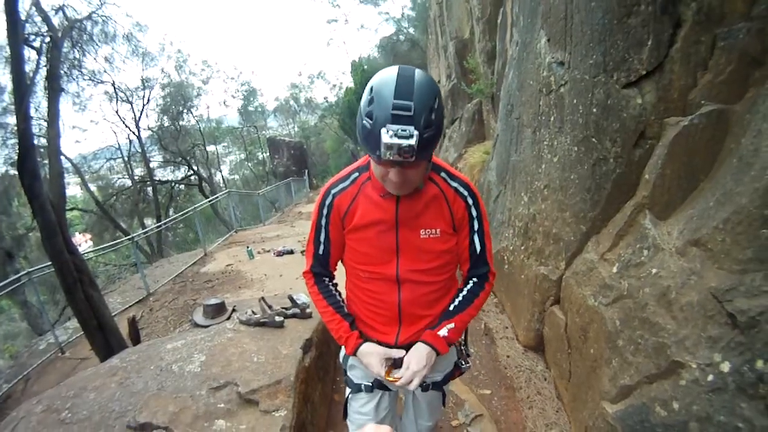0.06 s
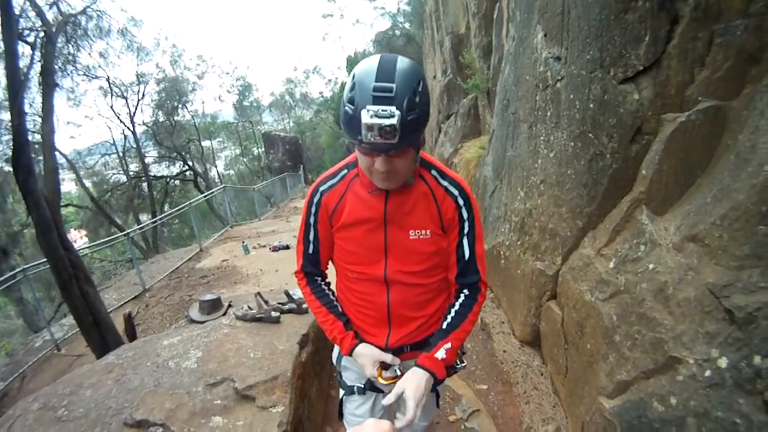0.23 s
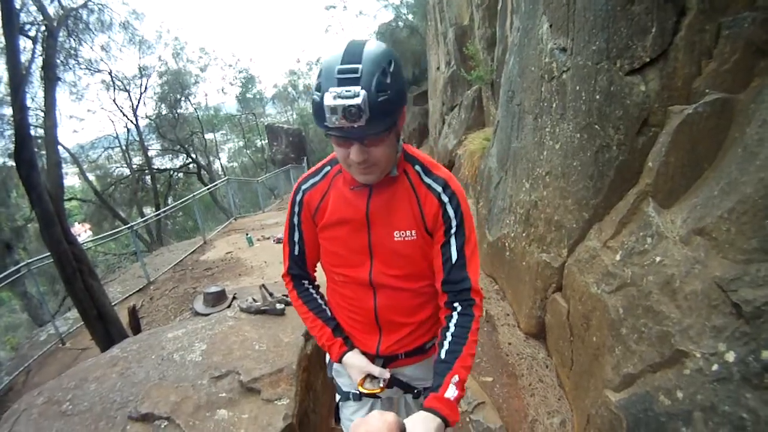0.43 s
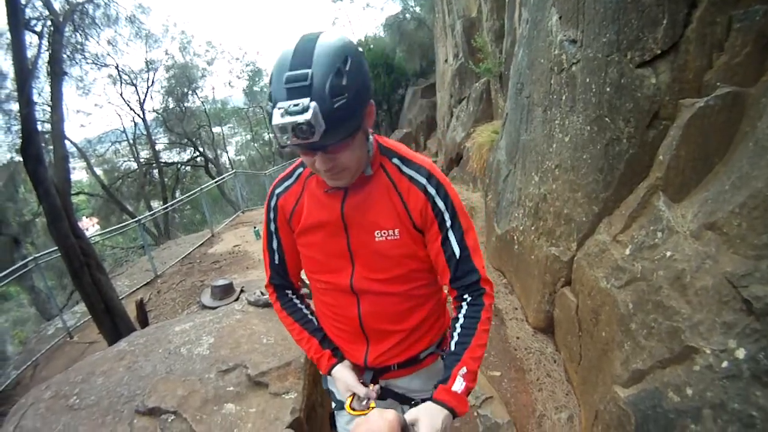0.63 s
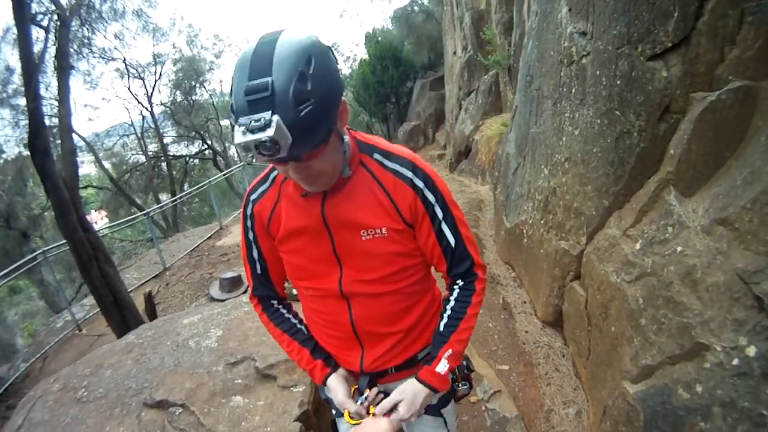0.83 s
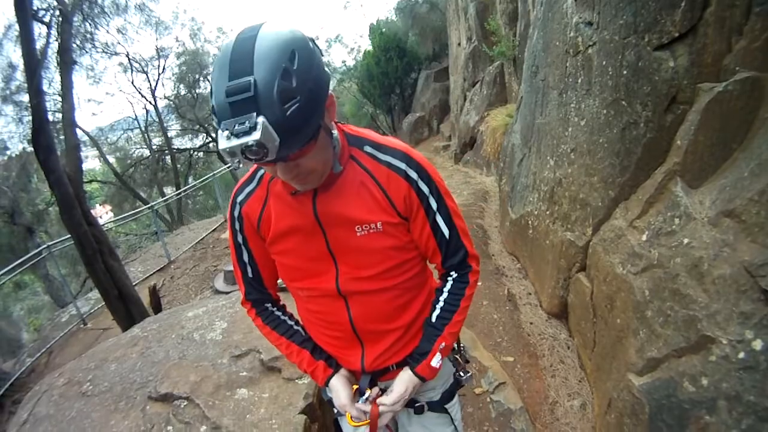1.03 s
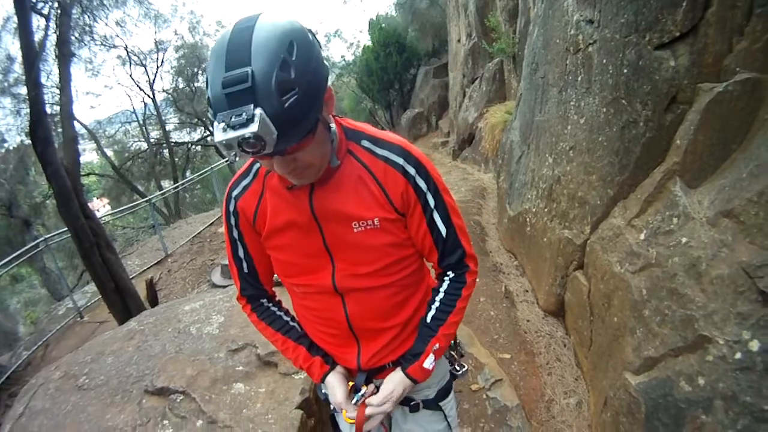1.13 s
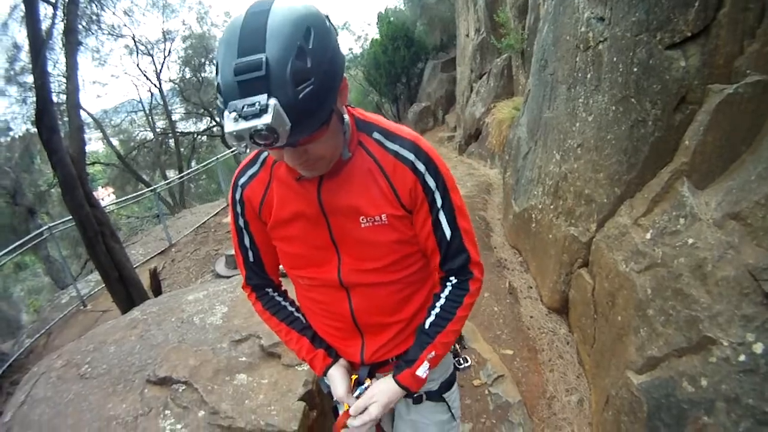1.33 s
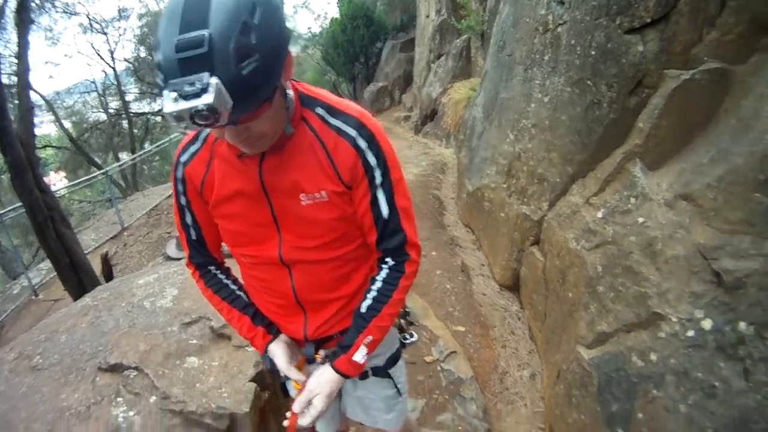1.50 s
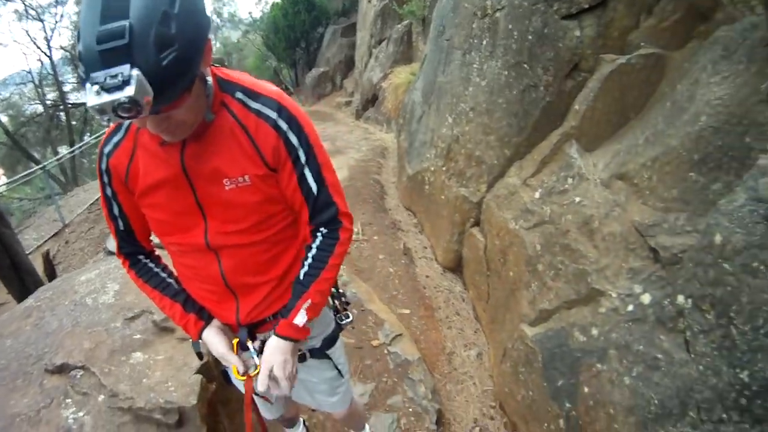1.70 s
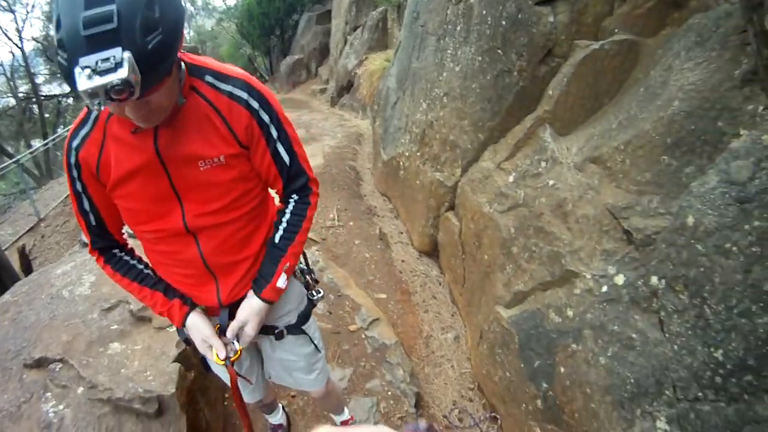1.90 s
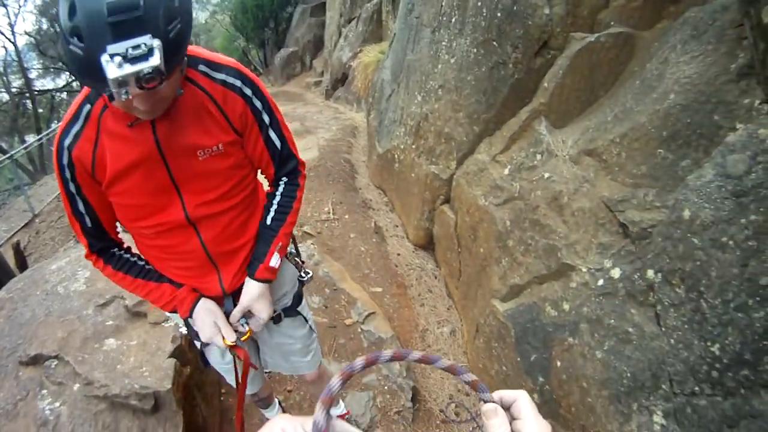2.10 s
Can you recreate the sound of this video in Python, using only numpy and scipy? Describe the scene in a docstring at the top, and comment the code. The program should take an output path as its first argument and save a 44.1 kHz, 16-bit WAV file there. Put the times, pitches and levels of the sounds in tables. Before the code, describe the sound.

A carabiner gate snaps shut at about 1.5 seconds with one sharp, briefly ringing metallic click. Before that, handled climbing gear clinks and ticks faintly, with a tiny scrape near 1.1 seconds. Dull knocks and low thumps on the body-worn microphone come between 0.2 and 0.8 seconds, with another low thump around 1.2. Steady outdoor hiss and rumble continue throughout, dipping briefly after the click.

```python
"""Climbing gear at the foot of a rock face, over steady outdoor hiss and low rumble.
Handled hardware clinks once, then ticks faintly; from 0.2 s a body-worn camera is knocked and sways.
At 1.14 s metal scrapes briefly on metal. At 1.48 s a carabiner gate snaps shut: it cracks, rattles
and rings the frame, with faint echoes from ground and rock.
Gain control ducks the hiss after each loud moment."""
import sys
import numpy as np
from scipy import signal
from scipy.fft import rfft, irfft
from scipy.io import wavfile
from scipy.ndimage import uniform_filter1d

SR = 44100
rng = np.random.default_rng(int(sys.argv[2]) if len(sys.argv) > 2 else 0)


def bounce(signal):
    """Save signal as a 16-bit WAV file at the path given by the first command-line argument."""
    frames = np.transpose(np.atleast_2d(signal))
    limited = np.clip(frames, -1, 1)
    pcm = np.round(limited * 32767).astype(np.int16)
    wavfile.write(sys.argv[1], SR, pcm)


N = 94815
BINS_HZ = np.fft.rfftfreq(N, 1 / SR)


def amp(db):
    """Decibels to gain."""
    return 10 ** (np.asarray(db) / 20)


def unit_rms(x):
    """Scales to rms 1."""
    return x / np.sqrt(np.mean(x ** 2) + 1e-20)


def at_hz(table, hz):
    """Interpolates a table over log frequency."""
    table_hz, value = np.transpose(table)
    return np.interp(np.log(hz + 1), np.log(table_hz + 1), value)


def since(start_s):
    """Seconds since the start, zero before."""
    return np.maximum(np.arange(N) / SR - start_s, 0)


def noise(spectrum):
    """Shaped noise, rms 1."""
    return unit_rms(irfft(rfft(rng.standard_normal(N)) * amp(at_hz(spectrum, BINS_HZ)), N))


def decay(t, t60_s):
    """Exponential decay."""
    return np.exp(-np.log(1000) * t / t60_s)


def strike(t, rise_s, t60_s):
    """Quick rise, exponential decay."""
    return (1 - np.exp(-t / rise_s)) * decay(t, t60_s)


def ring(start_s, modes, pitch_ratio=1):
    """Struck modes as damped sines."""
    t = since(start_s)
    return sum(amp(db) * strike(t, rise_s, t60_s) * np.sin(2 * np.pi * hz * pitch_ratio * t)
               for hz, db, t60_s, rise_s in modes)


def delayed(x, delay_s):
    """Delay, cut to N samples."""
    return np.concatenate([np.zeros(round(delay_s * SR)), x, np.zeros(N)])[:N]


def click(spectrum, size=2048):
    """Minimum-phase click, peak 1."""
    log_gain = np.log(amp(at_hz(spectrum, abs(np.fft.fftfreq(size, 1 / SR)))))
    pulse = np.fft.ifft(np.exp(np.conj(signal.hilbert(log_gain)))).real
    return pulse / abs(pulse).max()


def lowpass(x, hz, order):
    """Causal low-pass."""
    return signal.sosfilt(signal.butter(order, hz, fs=SR, output="sos"), x)


# gate contacts (time [s], level [dB])
GATE_CONTACTS = [(1.4808, -28), (1.4826, 0), (1.4902, -17), (1.4925, -12)]
# contact crack (frequency [Hz], level [dB])
CRACK_SPECTRUM = [(300, -42), (1100, -10), (1700, -13), (2400, 1), (3200, -2), (4300, -19), (6000, -34),
                  (9300, -10.5), (11500, -39), (13000, -30), (14700, -9), (16500, -33)]
# gate rattle (frequency [Hz], relative density [dB])
RATTLE_SPECTRUM = [(400, -19), (1100, -5), (1650, -6), (2400, 0), (3100, -1), (4100, -2), (5400, 2),
                   (6050, -17), (6700, 1.5), (9700, -5), (11000, -28), (13000, -32), (14300, -5),
                   (15000, -10), (15600, -23)]
# carabiner frame (frequency [Hz], level [dB], t60 [s], rise [s])
FRAME_MODES = [(1210, -21.5, 0.059, 0.00033), (1964, -24.5, .08, 0.00025), (2033, -14.5, 0.085, 0.00024),
               (2440, -22, 0.096, .0003), (2873, -17, 0.059, .0003), (3230, -26, .08, .0003),
               (4860, -20, .07, 0.00087), (4997, -1, 0.05, 0.0015), (5130, -17.5, .14, .002),
               (5640, -19, .05, .001), (6560, -19, 0.081, .001), (6849, -18, 0.1, .002),
               (7030, 0.5, 0.043, 0.0039), (9440, -26, .05, .0003)]


def gate_snap(snap_s=1.4829, seated_s=1.4925):
    """Each contact cracks; the main one rings the frame and rattles the gate. Seating damps the ring."""
    crack = amp(-0.5) * click(CRACK_SPECTRUM)
    cracks = sum(amp(db) * delayed(crack, time_s) for time_s, db in GATE_CONTACTS)
    rattle_db, side_db, hold_s = -16.5, -19, 0.0094
    grit = noise(RATTLE_SPECTRUM) + amp(side_db) * np.outer([1, -1], noise(RATTLE_SPECTRUM))
    rattle = (since(snap_s) > 0) * decay(since(snap_s + hold_s), t60_s=0.042) * grit
    damping_db, seating_s = -8.5, 0.0018
    damping = amp(damping_db * np.minimum(since(seated_s) / seating_s, 1))
    return cracks + damping * ring(snap_s, FRAME_MODES) + amp(rattle_db) * rattle


# gear touches (time [s], noise level [dB], rise [s], t60 [s], ping frequency [Hz], ping level [dB])
GEAR_TOUCHES = [(0.039, -32.5, .001, 0.065, 2610, -33), (.073, -28, 0.0035, .06, 2220, -35),
                (0.1416, -35, 0.0018, 0.037, 3900, -32.5), (.341, -29, 0.0033, 0.08, 2660, -34),
                (0.4402, -29, 0.00078, 0.038, 1180, -23), (0.5366, -27.5, 0.00055, .032, 2006, -33),
                (0.9455, -31, .0005, 0.019, 2030, -24), (1.1327, -27.5, .0004, .1, 3920, -33),
                (1.441, -30, 0.0038, 0.074, 3980, -34)]
# touch noise (frequency [Hz], relative density [dB])
TOUCH_SPECTRUM = [(600, -9), (1400, -13.5), (2150, 3.5), (2900, -8.5), (3700, -1), (5000, -12), (6000, -18),
                  (7000, -13), (8300, -9.5), (9700, -10), (11500, -28), (13000, -25), (14500, -10),
                  (16000, -30)]


def gear_ticks():
    """Each light touch of hardware gives a noise burst and rings one note."""
    grit = noise(TOUCH_SPECTRUM)
    ticks = np.zeros(N)
    for time_s, grit_db, rise_s, t60_s, ping_hz, ping_db in GEAR_TOUCHES:
        t = since(time_s)
        ping = amp(ping_db) * np.sin(2 * np.pi * ping_hz * t)
        ticks += strike(t, rise_s, t60_s) * (amp(grit_db) * grit + ping)
    return ticks


# one slide (time [s], length [s], level [dB])
SCRAPE_STROKE = (1.136, 0.017, -33.5)
# sliding metal (frequency [Hz], width [Hz], relative level [dB])
SCRAPE_RESONANCES = [(3880, 700, -1), (5650, 270, 2), (6390, 300, 0), (8050, 600, -5)]


def gear_scrape():
    """Metal slides on metal: friction noise through its resonances."""
    start_s, length_s, level_db = SCRAPE_STROKE
    response = sum(amp(db) / (1 + 2j * (BINS_HZ - hz) / width_hz) ** 2
                   for hz, width_hz, db in SCRAPE_RESONANCES)
    friction = unit_rms(irfft(rfft(rng.standard_normal(N)) * response, N))
    stroke = np.sin(np.pi * np.minimum(since(start_s) / length_s, 1))
    return amp(level_db) * stroke * friction


# clinking hardware (frequency [Hz], level [dB], t60 [s], rise [s])
CLINK_MODES = [(3590, -34, 0.086, .0005), (5030, -38, 0.049, .0005), (8414, -41, 0.15, .0005)]


def gear_clink():
    """Hardware rings faintly at the start."""
    return ring(0, CLINK_MODES)


# reflections (delay [s], level [dB])
ROCK_REFLECTIONS = [(.0135, -26), (.0275, -24)]


def rock_echoes(stereo):
    """Ground and rock face each return a faint near echo."""
    return np.array([sum(amp(db) * delayed(channel, delay_s) for delay_s, db in ROCK_REFLECTIONS)
                     for channel in stereo])


# knocks on the camera (time [s], level [dB], pitch [ratio])
HOUSING_KNOCKS = [(0.2096, -10.5, 0.89), (0.2212, -23, 0.79), (0.4379, -5, 0.99), (0.4561, -15.5, 1.01),
                  (.641, -19.5, 0.79), (.662, -26, .8), (0.765, -7, 0.96)]
# camera housing (base frequency [Hz], relative level [dB], t60 [s], rise [s])
HOUSING_MODES = [(107.2, -0.5, 0.061, 0.0013), (202.4, 3, .028, 0.0012), (285, -4, 0.051, 0.0025)]
KNOCK_CUTOFF_HZ = 384


def camera_knocks():
    """Each knock rings the housing with a dull puff of noise."""
    dull_noise = amp(-14.5) * unit_rms(lowpass(rng.standard_normal(N), KNOCK_CUTOFF_HZ, order=4))
    knocks = np.zeros(N)
    for time_s, db, pitch_ratio in HOUSING_KNOCKS:
        puff = dull_noise * strike(since(time_s), rise_s=0.0015, t60_s=0.089)
        knocks += amp(db) * (puff - ring(time_s, HOUSING_MODES, pitch_ratio))
    return lowpass(knocks, KNOCK_CUTOFF_HZ, order=6)


# mount motion (peak time [s], level [dB], frequency [Hz], rise [s], fall [s])
MOUNT_SWAYS = [(.364, -2, 41.4, 0.016, 0.029), (.549, -20.5, 25.6, .01, .05), (.685, -19, 27.6, .03, .03),
               (0.808, -16, 39.8, 0.027, 0.013), (1.205, -2, 38, 0.023, 0.028),
               (1.294, -9, 40.8, 0.022, .012)]


def mount_sway():
    """The camera mount swings for a cycle or two at a time."""
    sways = np.zeros(N)
    for peak_s, db, hz, rise_s, fall_s in MOUNT_SWAYS:
        t = since(0) - peak_s
        swell = np.exp(-(t / np.where(t < 0, rise_s, fall_s)) ** 2)
        sways += amp(db) * swell * np.cos(2 * np.pi * hz * t)
    return sways


# outdoor air (frequency [Hz], relative density [dB])
AIR_SPECTRUM = [(12, -45), (20, 2), (44, 1.5), (65, -3.5), (91, -8), (134, -10), (154, -13), (187, -12.5),
                (285, -15.5), (319, -18), (513, -20), (825, -23), (897, -22), (1480, -26), (2080, -24.5),
                (2390, -27.5), (5080, -33.5), (6010, -46.5), (6910, -36), (9950, -39.5), (12100, -46.5),
                (14300, -41), (16000, -48)]
# overall drift (time [s], level [dB])
AIR_DRIFT = [(0, -3.5), (.15, -2.5), (.3, -1), (.6, .4), (.9, 1.2), (1.05, 2), (1.4, 1.3), (1.7, 1.5),
             (2.15, 1.3)]
# added drift of the rumble (time [s], level [dB])
RUMBLE_DRIFT = [(0, -2.5), (.3, 1.5), (.6, 2), (.9, -.5), (1.15, 1.5), (1.45, -1), (1.75, -1), (2.15, 1)]
# left-right likeness (frequency [Hz], coherence [0-1])
AIR_COHERENCE = [(100, 1), (300, 0.99), (700, 0.97), (3000, 0.87), (8000, 0.78), (10500, 1)]


def outdoor_air(air_db=-29.5, patch_db=1.5, rumble_corner_hz=180):
    """Hiss and rumble, nearly alike in both ears, with faint drifting patches."""
    sources = np.array([noise(AIR_SPECTRUM), noise(AIR_SPECTRUM)])
    hz, t, spectra = signal.stft(sources, SR, nperseg=1024, noverlap=768)
    coherence = at_hz(AIR_COHERENCE, hz)[:, None]
    mid = spectra[0] * np.sqrt((1 + coherence) / 2)
    side = spectra[1] * np.sqrt((1 - coherence) / 2)
    patches = uniform_filter1d(rng.standard_normal(mid.shape), size=14, axis=0)
    patches = unit_rms(uniform_filter1d(patches, size=12, axis=1))
    drift_db = np.interp(t, *np.transpose(AIR_DRIFT))
    low_shelf = 1 / (1 + (hz / rumble_corner_hz) ** 2)
    rumble_db = np.outer(low_shelf, np.interp(t, *np.transpose(RUMBLE_DRIFT)))
    gain = amp(air_db + drift_db + rumble_db + patch_db * patches)
    return signal.istft(gain * np.array([mid + side, mid - side]), nperseg=1024, noverlap=768)[1][:, :N]


def scene():
    """Hardware and its echoes, camera handling, open air."""
    hardware = gate_snap() + gear_ticks() + gear_scrape() + gear_clink()
    return hardware + rock_echoes(hardware) + camera_knocks() + mount_sway() + outdoor_air()


def gain_control(stereo, threshold_db=-6, attack_s=0.0013, release_db_per_s=15):
    """Peaks pull the gain down fast; it recovers slowly."""
    over_db = np.maximum(20 * np.log10(abs(stereo).max(0) + 1e-9) - threshold_db, 0)
    release_db = since(0) * release_db_per_s
    held_db = np.maximum.accumulate(over_db + release_db) - release_db
    pole = np.exp(-1 / (attack_s * SR))
    return stereo / amp(signal.lfilter([1 - pole], [1, -pole], held_db))


def record(dry):
    """Gain control, soft clip, a faint high zing riding on the low bumps, band limit."""
    ceiling, zing_hz, zing_db, cutoff_hz = 0.65, 12030, -41, 15800
    ducked = gain_control(dry)
    clipped = ducked / (1 + (ducked / ceiling) ** 8) ** (1 / 8)
    bumps = lowpass(clipped, KNOCK_CUTOFF_HZ, order=2)
    zing = amp(zing_db) * bumps * np.cos(2 * np.pi * zing_hz * since(0))
    band_limit = signal.firwin(255, cutoff_hz, window=("kaiser", 9), fs=SR)
    return signal.oaconvolve(clipped + zing, band_limit[None], "same")


dry = scene()
out = record(dry)
bounce(out)
```